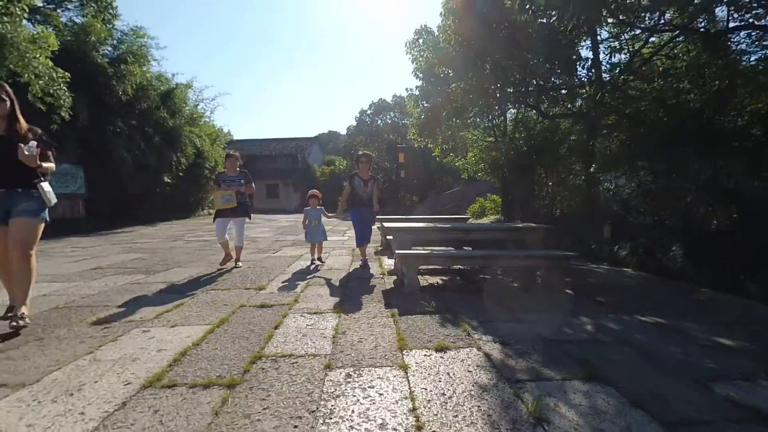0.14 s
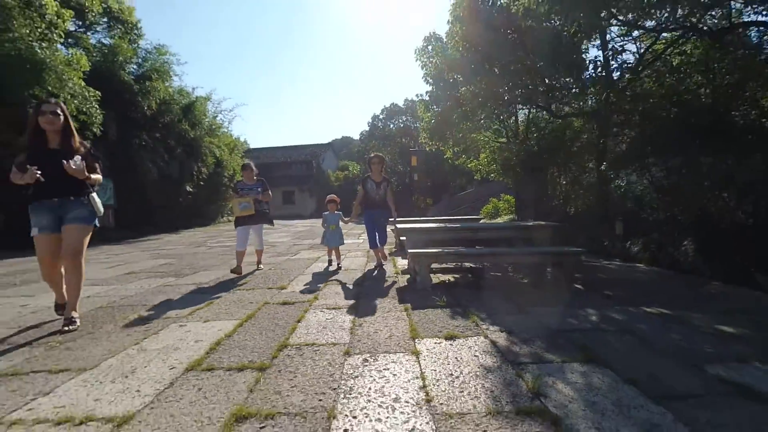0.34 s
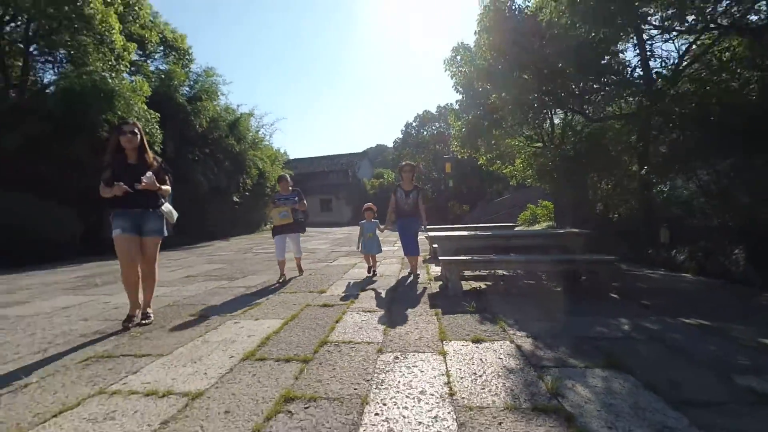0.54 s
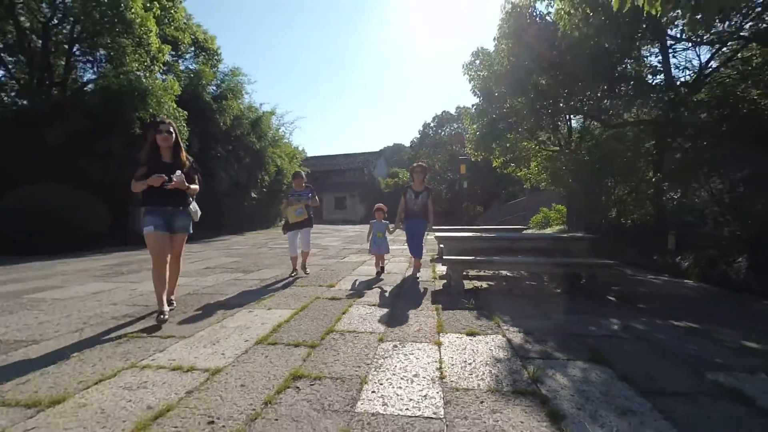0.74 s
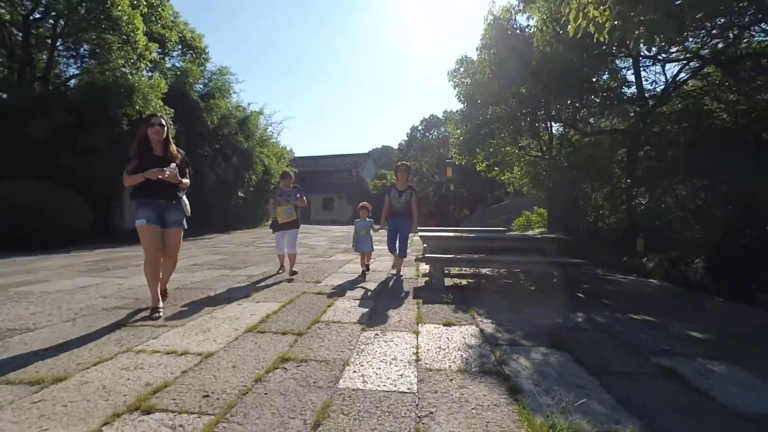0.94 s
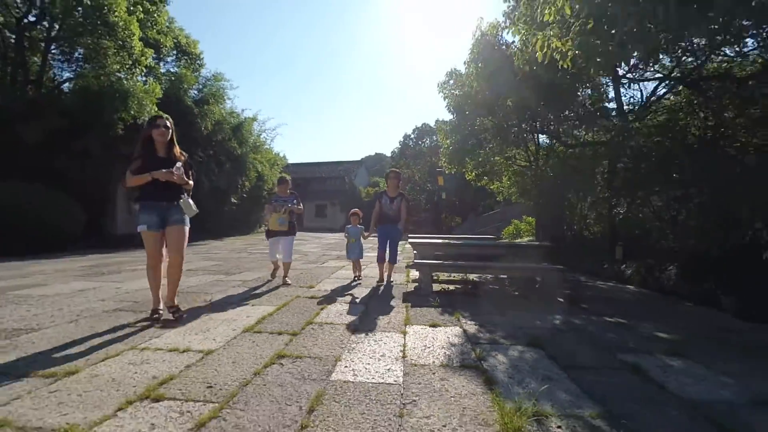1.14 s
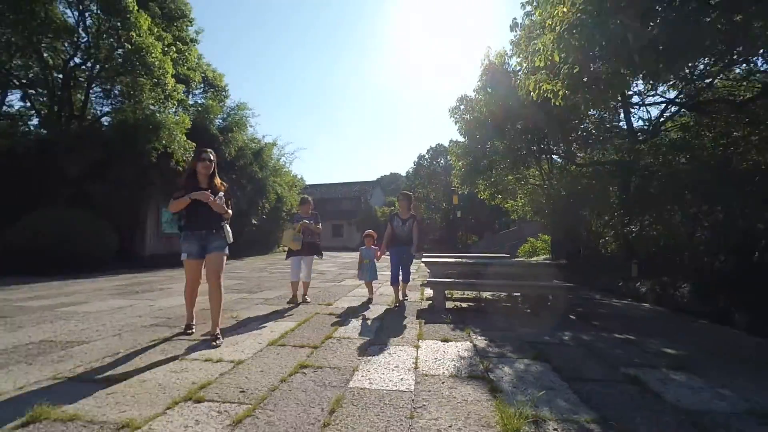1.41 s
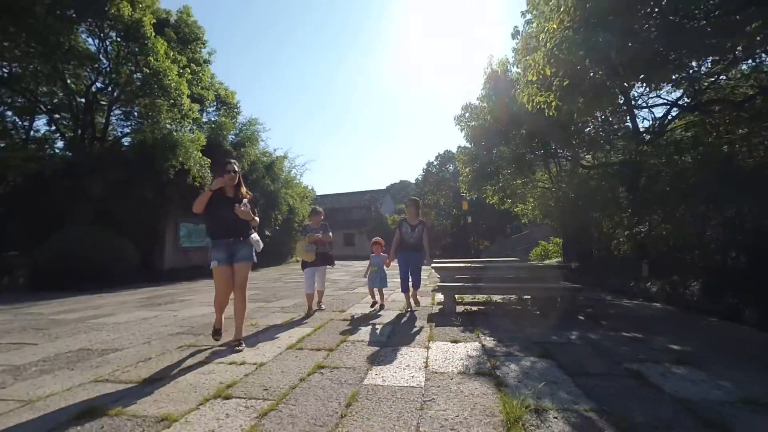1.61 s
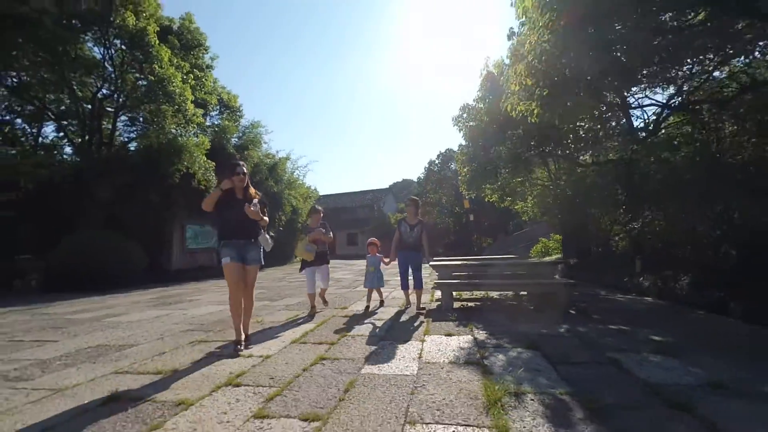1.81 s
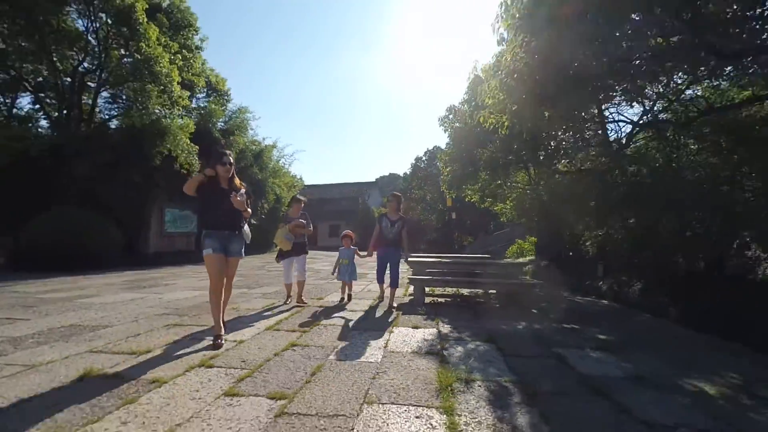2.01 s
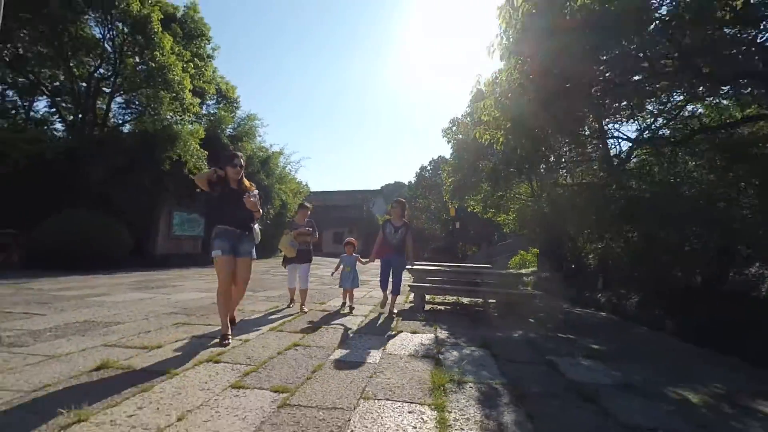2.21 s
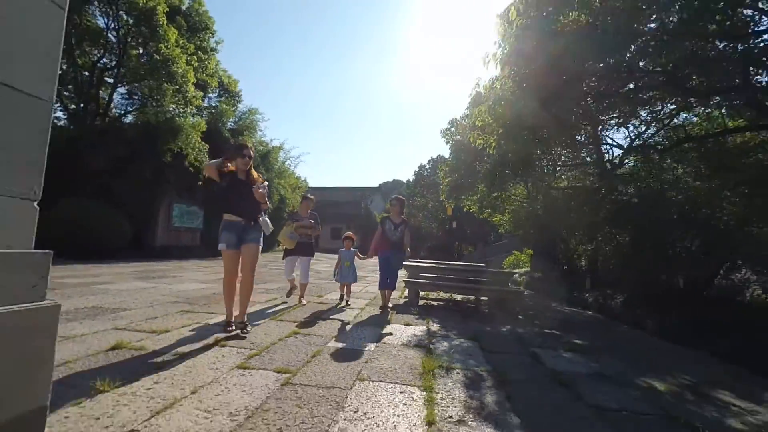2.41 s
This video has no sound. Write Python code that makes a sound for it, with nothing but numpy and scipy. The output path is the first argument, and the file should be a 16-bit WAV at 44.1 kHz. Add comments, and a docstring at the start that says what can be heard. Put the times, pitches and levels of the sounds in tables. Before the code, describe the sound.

Cicadas sing steadily in trees along a stone path, two rattling close by over a shrill distant chorus. A thin high buzz swells early on, while wind rumbles on the microphone and a few soft footsteps scuff the paving.

```python
"""Cicadas along a stone path

Two near cicadas rattle, their timbal clicks ringing their bodies, over a broad, distant chorus
of shrill noise bands. A thin high buzz of fast-pulsed hiss swells during the first second.
Wind rumbles on the microphone, with a few soft footfalls and faint shoe scuffs. All is mono."""
import sys
import numpy as np
from scipy import signal
from scipy.fft import rfft, irfft, next_fast_len
from scipy.io import wavfile
from scipy.ndimage import map_coordinates

SR = 44100
rng = np.random.default_rng(int(sys.argv[2]) if len(sys.argv) > 2 else 0)


def store_pcm(level_fs):
    """Save levels as 16-bit WAV."""
    pcm = np.round(np.clip(level_fs, -1, 1) * 32767).astype(np.int16)
    wavfile.write(sys.argv[1], SR, np.atleast_2d(pcm).T)


N = 112454

# body resonances of the two near cicadas: frequency_hz, relative_db
LEAD_BODY = [(2500, -44), (3100, -17), (3550, -6.5), (4000, -8.5), (4700, -4), (5600, 0), (6600, -5),
             (7500, -10.5), (10000, -17.5), (15000, -32)]
SECOND_BODY = [(3000, -27), (4200, -7), (5100, -9.5), (6500, 2.5), (8000, -11), (10000, -7.5), (12000, -23),
               (15000, -24)]
# tone of the far chorus, upper and lower voices: frequency_hz, relative_db
HIGH_CHORUS_TONE = [(2500, -64), (4200, -18), (5000, -10), (5600, -1.5), (6000, 0), (6900, -2),
                    (7400, -5.5), (8300, -10.5), (9400, -11), (11500, -24), (13500, -32), (15300, -33)]
LOW_CHORUS_TONE = [(2000, -46), (2900, -23.5), (3200, -12), (3550, -7), (4000, -6.5), (4350, -1.5),
                   (4900, -2.5), (5400, -3.5), (6200, -22), (9000, -48)]
# fader ride of the upper voices, before their trim: time_s, level_db
HIGH_CHORUS_RIDE = [(0, -30.5), (.22, -29), (.48, -28.5), (.62, -28), (.78, -27), (.98, -28.5),
                    (1.3, -27.5), (1.66, -28.5), (1.88, -28), (2.02, -27), (2.18, -27), (2.36, -29.5),
                    (2.52, -27)]
# fader ride of the lower voices: time_s, level_db
LOW_CHORUS_RIDE = [(0, -37.5), (.19, -35), (.45, -36.5), (.67, -35), (.74, -32.5), (.93, -35), (1.07, -35),
                   (1.42, -34.5), (1.65, -33.5), (1.8, -33.5), (1.92, -33), (2.14, -37), (2.35, -33.5),
                   (2.49, -34)]
# narrow notes ringing in the chorus: pitch_hz, width_hz, level_db
CHORUS_NOTES = [(3570, 60, -52.5), (4704, 46, -42), (5080, 93, -40), (5160, 29, -52), (6540, 18, -44.5),
                (6880, 82, -48), (7900, 46, -53)]
# tone of the thin high buzz: frequency_hz, relative_db
BUZZ_TONE = [(3000, -23), (6000, -36), (8000, 6.5), (9500, -4), (11500, -1), (13000, -8.5), (15300, -18)]
# swell of the buzz, before its trim: time_s, level_db
BUZZ_RIDE = [(0, -48.5), (.4, -45.5), (.8, -41), (1.02, -43.5), (1.35, -40), (2.5, -41)]
# rumble of wind on the microphone: frequency_hz, relative_db
WIND_TONE = [(15, 6.5), (30, -1), (55, -2.5), (80, -6), (120, -9), (170, -16), (250, -21), (500, -34),
             (1500, -65)]
# gusts, before their trim: time_s, level_db
WIND_RIDE = [(0, -38.5), (.42, -44), (.53, -34), (.72, -41.5), (1.1, -39), (1.17, -36.5), (1.48, -41),
             (1.56, -48), (1.7, -32.5), (1.82, -34), (2.1, -45), (2.42, -43.5), (2.55, -36)]
# tone of the outdoor bed: frequency_hz, relative_db
AIR_TONE = [(60, -15), (150, -3), (300, -2), (500, -3), (1000, -2.5), (1800, -2.5), (2600, 0), (4000, -6),
            (15000, -20.5)]
# soft footfalls: start_s, level_db
FOOTFALLS = [(0.472, -33), (.484, -23), (0.668, -37.5), (1.15, -44), (1.422, -47), (1.772, -29.5)]
# dull modes under each footfall: pitch_hz, relative_db, t60_s
THUD_MODES = [(61.5, -6.5, 0.23), (110, -8.5, 0.081), (172, -4.5, 0.061), (265, -19, 0.029)]
# tone of a footfall's puff: frequency_hz, relative_db
PUFF_TONE = [(25, -17), (60, -10), (170, 6), (300, -4), (450, -20), (900, -14), (3000, -46)]
# shoe scuffs on the stone: start_s, level_db, t60_s
SCUFFS = [(.47, -41, 0.049), (1.036, -35, 0.033), (1.488, -57, 0.031), (1.851, -37, 0.045),
          (2.229, -44, 0.052), (2.514, -35, 0.036)]
# gritty tone of a scuff: frequency_hz, relative_db
GRIT_TONE = [(150, -15), (350, -8), (800, 2), (1500, -2), (2500, 8), (6000, -12), (12000, -30)]
# low wind buffets on the microphone: start_s, length_s, pitch_hz, level_db
BUFFETS = [(1.192, 0.16, 11, -30.5), (1.662, 0.14, 57, -31.5), (2.472, 0.14, 14, -28)]

CLICKS_PER_STROKE, CLICK_RISE_S = 6, 0.00039
TOP_HZ = 15330
T = np.arange(N) / SR


def amp(db):
    """Decibels to gain."""
    return 10 ** (np.asarray(db) / 20)


def unit(x):
    """Scale to rms 1."""
    return x / np.sqrt(np.mean(x ** 2) + 1e-20)


def ride(points):
    """A fader ride: straight lines through (time_s, level_db) points."""
    return np.interp(T, *np.transpose(points))


def wobble(rate):
    """A smooth random curve, rate knots a second."""
    return map_coordinates(rng.standard_normal(512), [T * rate + 2], mode="wrap")


def filtered(x, response):
    """Filter x by a gain that depends on frequency."""
    size = next_fast_len(N + SR // 2)
    return irfft(rfft(x, size) * response(np.fft.rfftfreq(size, 1 / SR)), size)[:N]


def coloured(x, tone):
    """x through an EQ curve, at rms 1."""
    points_hz, db = np.transpose(tone)
    return unit(filtered(x, lambda hz: amp(np.interp(np.log(hz + 1), np.log(points_hz), db))))


def noise(tone):
    """Noise of rms 1 with the given tone."""
    return coloured(rng.standard_normal(N), tone)


def fuzzy_note(pitch_hz, width_hz):
    """Noise through one sharp resonance, at rms 1."""
    hiss = rng.standard_normal(N)
    return unit(filtered(hiss, lambda hz: 1 / (1 + ((hz - pitch_hz) / width_hz * 1.3) ** 2)))


def cicada(body, stroke_hz, offset_s, scatter, drift_strokes, waver_db, depth=0.96, t60_s=0.012):
    """Each timbal stroke buckles a row of ribs; the clicks ring the body and scatter in the leaves."""
    strokes = (T - offset_s) * stroke_hz + drift_strokes * wobble(7)
    hits = np.flatnonzero(np.diff(np.floor(strokes * CLICKS_PER_STROKE)) > 0)
    swell = 1 + depth * np.cos(2 * np.pi * strokes[hits])  # clicks rise and fade within a stroke
    clicks = np.zeros(N)
    clicks[hits] = swell * amp(.5 * rng.standard_normal(N)[hits])
    age = T[:SR // 20]
    decay = amp(-60 * age / t60_s) * (1 - np.exp(-age / CLICK_RISE_S))
    # every click rings alike; its scattered share is fresh noise with the same decay
    ringing = signal.fftconvolve(clicks, decay * rng.standard_normal(len(decay)))[:N]
    energy = np.abs(signal.fftconvolve(clicks ** 2, decay ** 2)[:N])
    scattered = np.sqrt(energy) * rng.standard_normal(N)
    song = np.sqrt(1 - scatter) * coloured(ringing, body) + np.sqrt(scatter) * coloured(scattered, body)
    return song * amp(waver_db * wobble(3.8))


def near_cicadas():
    """Two insects rattle at different rates; the lead swells with the chorus, the second with the buzz."""
    lead = cicada(LEAD_BODY, stroke_hz=48.5, offset_s=.001, scatter=.49, drift_strokes=.035, waver_db=.37)
    second = cicada(SECOND_BODY, stroke_hz=43.2, offset_s=.005, scatter=.41,
                    drift_strokes=.06, waver_db=.8)
    chorus_db, buzz_db = ride(HIGH_CHORUS_RIDE), ride(BUZZ_RIDE)
    lead_db = -33 + .5 * (chorus_db - chorus_db.mean())
    second_db = -39 + buzz_db - buzz_db.mean()
    return amp(lead_db) * lead + amp(second_db) * second


def far_chorus(high_trim_db=-1.5):
    """Many far cicadas blur into two shrill bands with a few ringing notes."""
    notes = sum(amp(db) * fuzzy_note(hz, width) for hz, width, db in CHORUS_NOTES)
    high = amp(ride(HIGH_CHORUS_RIDE) + high_trim_db) * noise(HIGH_CHORUS_TONE)
    low = amp(ride(LOW_CHORUS_RIDE)) * noise(LOW_CHORUS_TONE)
    return high + low + notes


def high_buzz(pulse_hz=1152, trim_db=0.5):
    """A thin hiss chopped into very fast, even pulses."""
    pulses = np.exp(2 * np.cos(2 * np.pi * pulse_hz * T)) * rng.standard_normal(N)
    return amp(ride(BUZZ_RIDE) + trim_db) * coloured(pulses, BUZZ_TONE)


def wind(trim_db=-3):
    """Gusts rumble on the microphone."""
    return amp(ride(WIND_RIDE) + trim_db) * noise(WIND_TONE)


def outdoor_bed():
    """Faint, slightly fluttering air over a low drone."""
    air = amp(-48 + 0.66 * wobble(9.07) + 1.34 * wobble(60)) * noise(AIR_TONE)
    drone = amp(-46.5) * fuzzy_note(pitch_hz=53, width_hz=7.7)
    return air + drone


def shoe_contact(start_s, level_db, t60_s, tone, attack_s):
    """A shoe meets stone: a burst of noise that rises fast and dies."""
    age = np.maximum(T - start_s, 0)
    return amp(level_db - 60 * age / t60_s) * (1 - np.exp(-age / attack_s)) * noise(tone)


def scuffs():
    """Soles scuff the stone in short, gritty bursts."""
    return sum(shoe_contact(start_s, db, t60_s, GRIT_TONE, attack_s=.0011)
               for start_s, db, t60_s in SCUFFS)


def footfalls(puff_db=-13.5):
    """Each footfall rings a few dull modes under a soft puff."""
    out = np.zeros(N)
    for start_s, db in FOOTFALLS:
        out += shoe_contact(start_s, db + puff_db, t60_s=.094, tone=PUFF_TONE, attack_s=.00099)
        age = np.maximum(T - start_s, 0)
        for hz, mode_db, t60_s in THUD_MODES:
            out -= amp(db + mode_db - 60 * age / t60_s) * np.sin(2 * np.pi * hz * age)
    return out


def buffets():
    """Each buffet booms in the microphone, short and low, with an unsteady pitch."""
    out = np.zeros(N)
    for start_s, length_s, hz, db in BUFFETS:
        age = T - start_s
        swell = np.sin(np.pi * np.clip(age / length_s, 0, 1))
        out += amp(db) * swell * np.sin(2 * np.pi * hz * age + .5 * wobble(30))
    return out


def scene():
    """Insects, wind and steps, mixed dead centre."""
    insects = near_cicadas() + far_chorus() + high_buzz()
    mono = insects + wind() + outdoor_bed() + scuffs() + footfalls() + buffets()
    return np.array([mono, mono])


def record(dry):
    """A brick-wall low-pass cuts everything above TOP_HZ."""
    return np.array([filtered(channel, lambda hz: hz < TOP_HZ) for channel in dry])


dry = scene()
out = record(dry)
store_pcm(out)
```